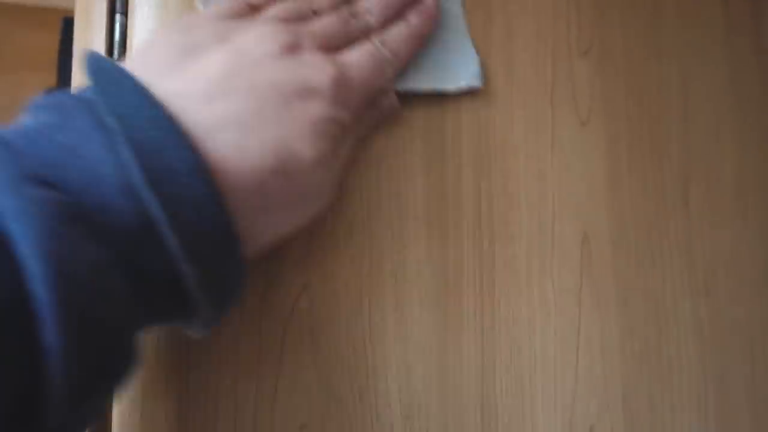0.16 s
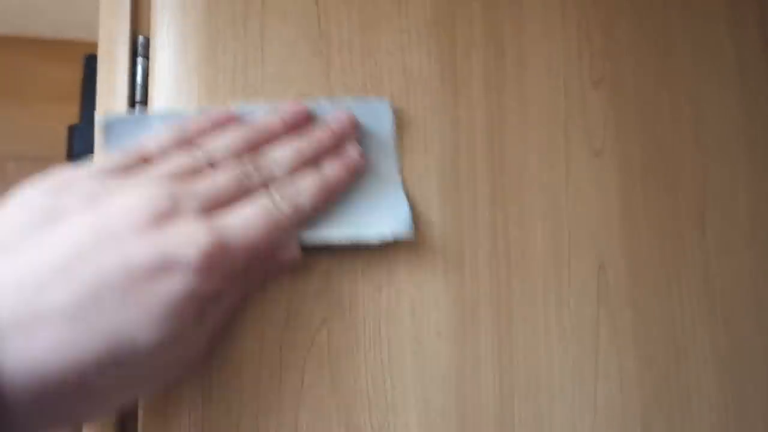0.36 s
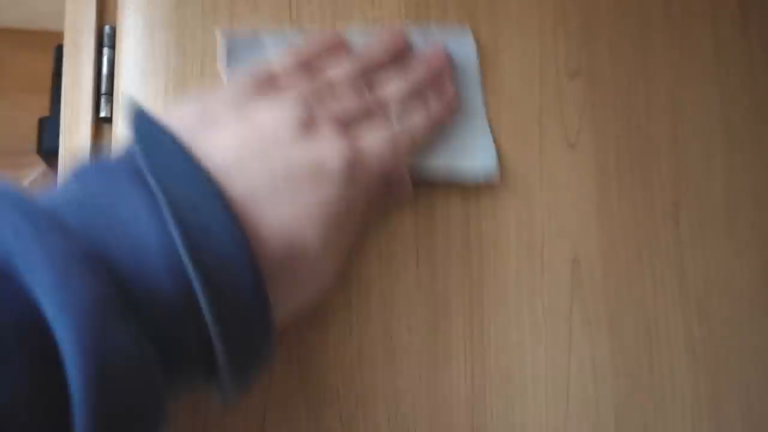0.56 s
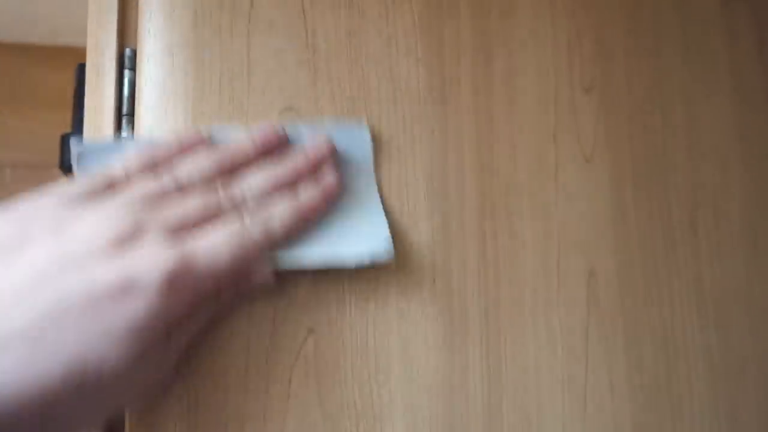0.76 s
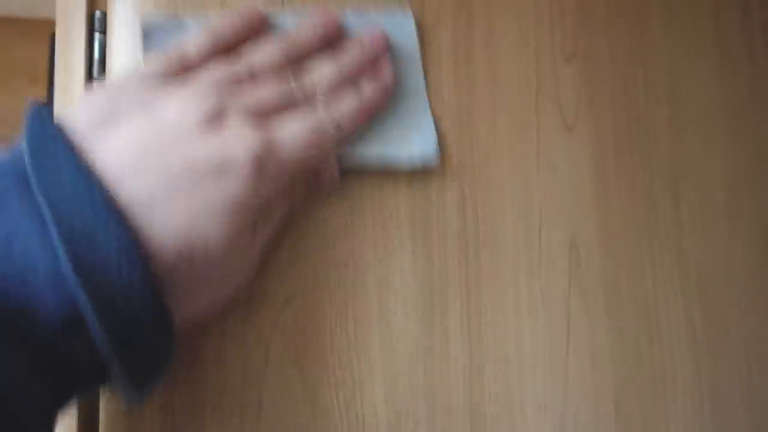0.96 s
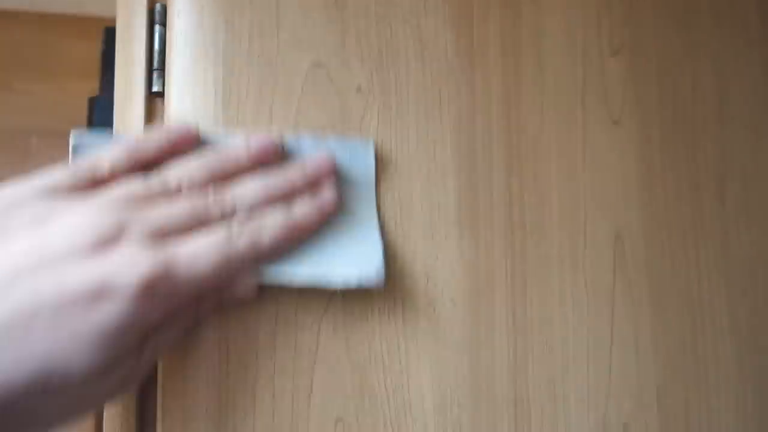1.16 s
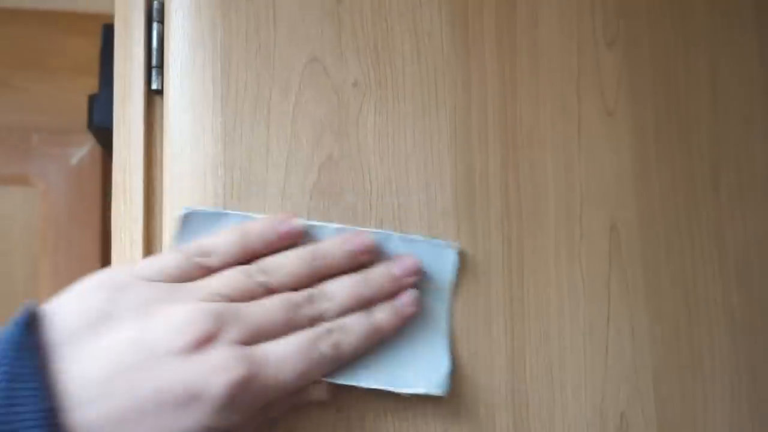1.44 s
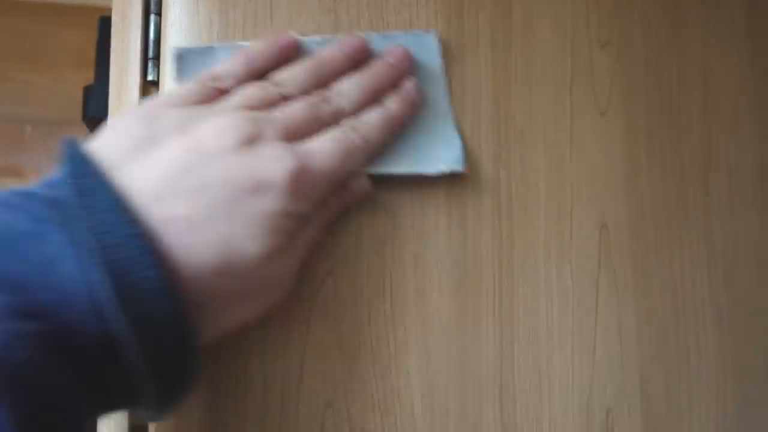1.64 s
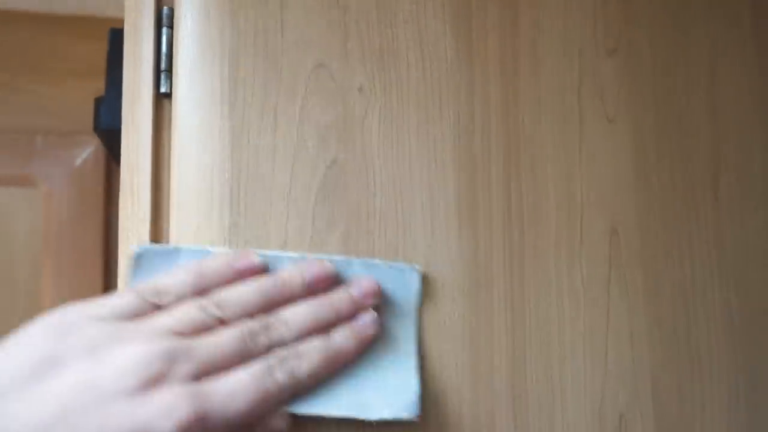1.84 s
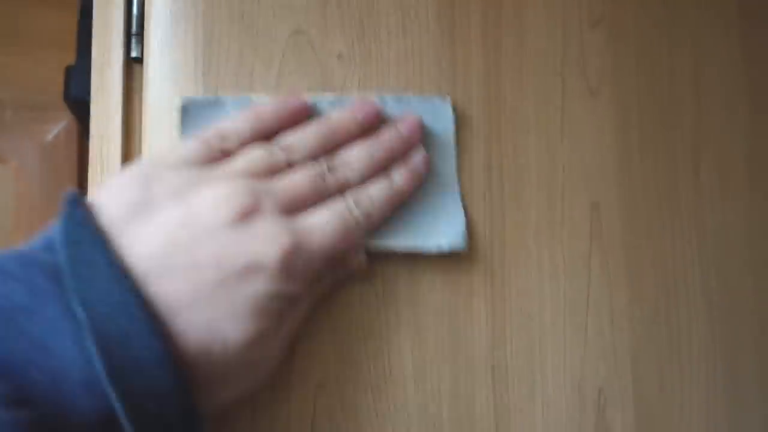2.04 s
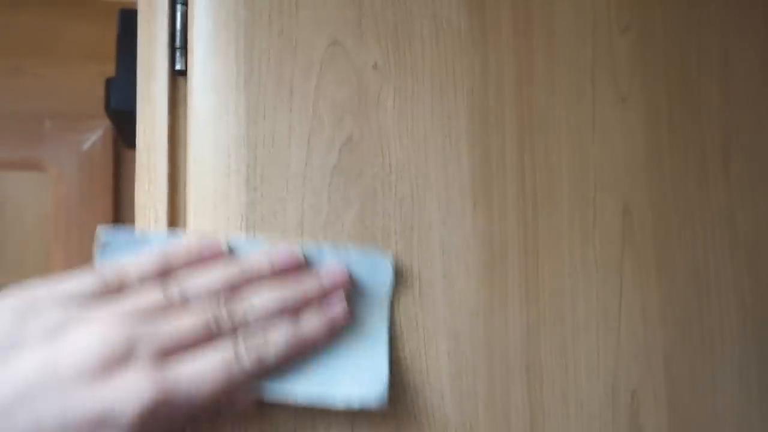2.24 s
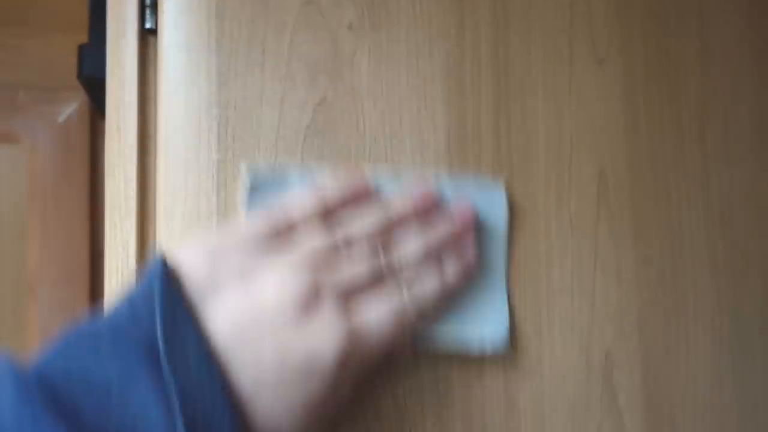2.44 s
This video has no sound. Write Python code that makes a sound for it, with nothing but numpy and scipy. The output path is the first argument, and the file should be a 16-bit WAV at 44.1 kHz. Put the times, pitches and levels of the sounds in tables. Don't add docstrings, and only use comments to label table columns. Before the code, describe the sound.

Sandpaper rubbed by hand over a wooden cabinet panel gives a bright, dense, scratchy rasp for about 2.6 seconds. It dulls briefly near 1.2 and 1.95 seconds as the hand slows. A faint hollow tone shifts beneath it, the board shudders around 0.35, and soft thumps come near 0.45, 0.8 and 1.0. A small rising squeak sounds at 2.3. Close stereo, quiet room with faint rumble.

```python
import sys
import numpy as np
from scipy import signal
from scipy.fft import rfft, irfft
from scipy.io import wavfile
from scipy.ndimage import uniform_filter1d

SR = 44100
rng = np.random.default_rng(int(sys.argv[2]) if len(sys.argv) > 2 else 0)


def to_wav(s):
    ch = np.atleast_2d(s).T
    pcm = np.round(np.clip(ch, -1, 1) * 32767)
    wavfile.write(sys.argv[1], SR, pcm.astype(np.int16))


def makeup_ratio(level_db):
    decades = np.asarray(level_db, float) / 20
    return 10 ** decades


N = 114660


def rms_one(x):
    return x / np.sqrt(np.mean(x ** 2) + 1e-20)


def in_time(rows):
    s, *columns = np.transpose(rows)
    return [np.interp(np.arange(N) / SR, s, column) for column in columns]


def at_hz(points, hz, axis=1):
    points = np.array(points)
    return np.interp(np.log(hz), np.log(points[:, 0]), points[:, axis])


def swing(x):
    return x - x.mean()


def high_pass(x, order, hz):
    return signal.sosfilt(signal.butter(order, hz, "high", fs=SR, output="sos"), x)


def drift(rate):
    r = np.exp(-40 * np.pi * rate / SR)
    noise = rng.standard_normal(N // 20 + 2002)
    slow = signal.lfilter([1], [1, -2 * r, r * r], noise)[2000:]
    return np.interp(np.arange(N) / 20, np.arange(len(slow)), rms_one(slow))


def grit():
    per_s, spread_db = 16000, 1.2
    sizes = makeup_ratio(spread_db * np.minimum(rng.exponential(1, N), 5))
    signs = rng.choice([-1, 1], N)
    return rms_one(sizes * signs * (rng.random(N) < per_s / SR))


def resonance(x, hz, width_hz):
    r = np.exp(-np.pi * width_hz / SR)
    poles = [1, -2 * r * np.cos(2 * np.pi * hz / SR), r * r]
    return signal.lfilter([(1 - r * r) / 2, 0, (r * r - 1) / 2], poles, x)


# f/Hz, likeness/0-1
LIKENESS = [(150, .999), (300, .995), (640, 0.89), (1400, 0.67), (3100, 0.77), (6800, 0.74), (10000, 0.65),
            (15000, 0.3)]
# f/Hz, level/dB
TILT = [(700, -0.5), (2000, -0.8), (5000, 0.5), (9000, 0.3), (13000, -4)]


def bands(low_hz, count, gain_db):
    edges = low_hz * 2 ** (np.arange(count + 1) / 3)
    grains = np.array([[grit(), grit()], [grit(), grit()]])
    out = 0
    for k, (low, high) in enumerate(zip(edges, edges[1:])):
        band = signal.butter(2, [low, high], "band", fs=SR, output="sos")
        mid, side = signal.sosfilt(band, grains[k % 2])
        hz = np.sqrt(low * high)
        alike = np.clip(at_hz(LIKENESS, hz), 0, 1)
        lean = makeup_ratio(at_hz(TILT, hz) * np.array([[.5], [-.5]]))
        stereo = np.sqrt(1 + alike) * mid + np.sqrt(1 - alike) * side * [[1], [-1]]
        out = out + makeup_ratio(gain_db(hz)) * lean * stereo
    return rms_one(out)


# t/s, level/dB, left-right/dB, deeper cut/dB rel. level
STROKE = [(0.0, -23.5, -2, -10.5), (0.03, -25, 1.5, -11.5), (0.76, -23.5, 1.0, -15), (1.0, -24, 2, -11),
          (1.1, -25, 2.0, -16), (1.12, -22.5, 1.5, -13.5), (1.22, -28.5, 1.0, -8.5),
          (1.24, -23.5, 1.5, -14.5), (1.56, -24.5, 1, -13), (1.76, -23.5, 1.5, -14.5),
          (1.92, -27, 0.0, -10), (1.95, -32, 1.0, -6.5), (2.03, -24, 1.0, -11), (2.17, -24, 1.0, -13),
          (2.28, -26.5, 0, -11), (2.33, -26, 2.5, -13.5), (2.51, -25, 0.5, -15.5), (2.6, -25, -0.5, -12)]
# t/s, level/dB
FINE_GRIT = [(0.0, -30.5), (0.06, -29), (0.93, -29.5), (0.96, -32.5), (1.13, -28.5), (1.22, -36.5),
             (1.25, -30), (1.38, -31), (1.44, -28), (1.54, -33), (1.85, -28), (1.98, -36.5), (2.01, -28.5),
             (2.11, -32.5), (2.17, -27.5), (2.27, -31.5), (2.36, -29.5), (2.6, -28.5)]
# f/Hz, level/dB per Hz
RASP_COLOUR = [(1180, -63), (2000, -10.5), (2720, -6), (3880, -1), (7720, -5.5), (10600, -3.5),
               (15600, -10.5), (16100, -5.5), (16500, -41)]
# f/Hz, speed share/1, fine-grit share/1, deeper-cut share/1
FOLLOWS = [(2000, 0.45, 0.06, 1.3), (2950, 1.36, 0.061, 0.82), (4160, 1.1, 0.25, 0.083),
           (6400, 0.99, 0.014, 0.0), (8500, 0.85, 0.96, 0.0), (12500, 1.37, 0.96, 0.0)]
# f/Hz, width/Hz, gain/dB
SHEET = [(3870, 250, 2), (4470, 220, 2), (5960, 3200, 3), (10800, 2300, 1.5), (15000, 1300, 3)]
# t/s, length/s, f/Hz, gain/dB
SPOTS = [(.28, 0.042, 7200, 2.5), (0.271, 0.036, 5100, 2), (.3, 0.033, 13800, -1), (.42, .05, 11500, 3),
         (0.488, .02, 13000, -3), (.57, 0.03, 13000, -5), (.6, 0.1, 7410, 3.5), (.78, .07, 9000, -1.5),
         (0.858, 0.039, 12500, -2.5), (.93, 0.028, 6200, 3.5), (0.982, 0.028, 12800, -7),
         (1.022, 0.037, 6300, 4.5), (1.364, .03, 13200, -3), (1.45, .03, 14200, 0), (1.673, 0.047, 4260, 3),
         (1.747, 0.059, 6600, 3.5), (1.761, .04, 5200, -0.5), (1.78, .06, 13000, -1),
         (1.873, 0.033, 6560, 4.5), (1.969, .015, 11400, -7), (1.965, .015, 6200, -4),
         (2.0, 0.017, 9500, 2), (2.16, 0.06, 4700, 0.5), (1.19, .025, 7500, -2.5), (0.573, 0.023, 3950, 2),
         (2.22, 0.07, 10540, -2), (2.3, 0.062, 5940, -3), (2.422, 0.057, 4400, 3), (2.469, 0.064, 13600, 2),
         (2.572, 0.025, 3890, 4)]


def rasp():
    level_db, pan_db, deep_db = in_time(STROKE)
    top_db = in_time(FINE_GRIT)[0] - level_db
    clumps_db = 0.55 * (0.5 * drift(32) + drift(310))

    def gain_db(hz):
        follow_db = at_hz(FOLLOWS, hz) * swing(level_db)
        follow_db = follow_db + at_hz(FOLLOWS, hz, axis=2) * swing(top_db)
        follow_db = follow_db + at_hz(FOLLOWS, hz, axis=3) * swing(deep_db)
        patchy_db = 0.6 * drift(17.0)
        return at_hz(RASP_COLOUR, hz) + clumps_db + patchy_db + follow_db

    out = high_pass(bands(1378, 11, gain_db), 4, 1650)
    for hz, width_hz, db in SHEET:
        out = out + (makeup_ratio(db) - 1) * resonance(out, hz, width_hz)
    spot_q = 7.4
    for s, length_s, hz, db in SPOTS:
        passing = np.exp(-((np.arange(N) / SR - s) / length_s) ** 2)
        out = out + (makeup_ratio(db) - 1) * passing * resonance(out, hz, hz / spot_q)

    speckle_q, speckle_db, speckle_per_s = 60, -10, 8
    speckle = 0
    for hz in np.geomspace(1700, 9500, 50) * rng.uniform(.985, 1.015, 50):
        speckle = speckle + makeup_ratio(speckle_db) * drift(speckle_per_s) * resonance(out, hz, hz / speckle_q)
    return makeup_ratio(level_db.mean() + 4.0 + pan_db * [[.5], [-.5]]) * rms_one(out + speckle)


# t/s, level/dB, centre f/Hz, overtone/dB rel. level
HOLLOW = [(0.01, -41, 1312, -5), (0.05, -40, 1490, -8), (0.17, -48.5, 1450, 10.5), (0.3, -36, 1467, -3),
          (0.37, -39, 1480, -5), (0.43, -45.5, 1394, 7.5), (0.53, -53, 1320, 11), (0.63, -45, 1400, 7.5),
          (0.74, -40, 1510, -9), (0.8, -42, 1443, 1.5), (0.89, -51.5, 1303, 8), (1.02, -50, 1326, 10.5),
          (1.14, -44.5, 1450, -2.5), (1.34, -49.5, 1398, 6.5), (1.6, -44.5, 1324, -2.5),
          (1.72, -49.5, 1356, 11), (1.83, -44.5, 1430, -7), (1.98, -43.5, 1264, -0.5),
          (2.14, -46, 1506, 0.5), (2.29, -44.5, 1332, 1.5), (2.5, -49.5, 1390, 2.5), (2.55, -43, 1318, -4),
          (2.59, -45.5, 1400, 2)]


def hollow():
    level_db, centre_hz, over_db = in_time(HOLLOW)
    tones = [(centre_hz, 565, level_db), (np.full(N, 1837), 420, level_db + over_db)]
    out = 0
    for hz, width_hz, db in tones:
        noise = [grit() + 1j * grit() for _ in range(2)]
        sway = signal.sosfilt(signal.butter(3, width_hz / 2, fs=SR, output="sos"), noise)
        mid, side = (sway * np.exp(2j * np.pi * np.cumsum(hz) / SR)).real
        stereo = rms_one(mid + 0.32 * side * [[1], [-1]])
        out = out + makeup_ratio(db + 0.5) * stereo * makeup_ratio([[.4], [-.4]])
    return out


# t/s, level/dB, then upper, main and lowest modes/dB rel. level
PRESS = [(0.01, -50, 1.5, -3, -6.5), (0.2, -53.5, 4.5, 5.5, -6), (0.3, -49, 2.5, -8, 0),
         (0.34, -42, -9, -10, -23), (0.42, -53, 6.5, -3, -4), (0.71, -48.5, -4.5, 4, -9),
         (0.85, -54.5, 5, -20, 0), (0.91, -55, 8, 8, -4), (1.05, -55.5, 0.5, 9, -2),
         (1.17, -47, -0.5, -4, -14), (1.22, -53.5, -3, 0, -8), (1.3, -61, 10, 2.5, -5),
         (1.49, -62, 1, 2, -7), (1.54, -52, 7, -9, 1), (1.63, -60, -1, 5, 7), (1.69, -51.5, -2, -2, -2),
         (1.79, -43, -3, -7, -16), (1.82, -61.5, 5, 5, 4), (1.9, -48.5, -2, -11, -5),
         (1.97, -53, -5, 2, -2), (2.05, -52.5, -3, 2, -5), (2.2, -55.5, 3, -2, -7),
         (2.31, -52.5, 5.5, -5, 1), (2.42, -53.5, -4, -8, -10), (2.59, -54, 9, -2, -4)]
# f/Hz, level/dB, t60/s
PANEL = [(110.3, -1, 0.065), (148, -4, 0.098), (210, -12, 0.069), (234.6, 4, 0.33), (323.4, -1, 0.098),
         (416, -8.5, 0.17), (529, -1, 0.13), (648.5, -8.5, 0.077), (774, -4, 0.09), (873, -11, 0.083),
         (1003, -12, 0.056), (1262, -7, 0.099)]
MODE_GROUPS_HZ = [180, 280, 600]


def panel():
    hand_smooth_s = 0.03
    level_db, upper_db, main_db, low_db = uniform_filter1d(in_time(PRESS), int(hand_smooth_s * SR))
    push = grit()
    groups = np.zeros((4, N))
    for k, (hz, db, t60) in enumerate(PANEL):
        width_hz = np.log(1000) / np.pi / t60
        drive = push * makeup_ratio(db + 2.0 * drift(7.5))
        ring = resonance(drive, hz, width_hz) / np.sqrt(width_hz)
        groups[np.searchsorted(MODE_GROUPS_HZ, hz)] += (-1) ** k * ring
    out = 0
    for group, db in zip(groups, [low_db, main_db, 0, upper_db]):
        out = out + makeup_ratio(level_db + db + 0.34) * rms_one(group)
    return out


# f/Hz, level/dB per Hz
ROOM = [(15, -50), (25, -20.5), (230, -3.5), (461, -6.5), (525, -8.5), (926, -7.5), (1200, -22),
        (1560, -36), (2640, -120)]


def room():
    press_db = in_time(PRESS)[0]

    def gain_db(hz):
        board_share = 0.35 * (MODE_GROUPS_HZ[1] < hz < MODE_GROUPS_HZ[2])
        return at_hz(ROOM, hz) + 1.5 * drift(3) + board_share * swing(press_db)

    return makeup_ratio(-49.0) * bands(21.44, 17, gain_db)


# t/s, f/Hz, level/dB, length/s
SHUDDERS = [(0.325, 413, -35, .02), (.343, 415, -34, 0.012), (.342, 287, -41, .012), (0.357, 244, -38, .02),
            (.395, 239, -41, 0.032), (.38, 486, -39, 0.0078), (1.153, 225, -41, 0.024),
            (1.178, 430, -39, .015), (1.18, 524, -43, .02), (1.328, 229, -44, 0.046),
            (1.711, 237, -40.5, .025), (1.42, 234.6, -49, 0.073), (1.784, 407, -42, .02),
            (1.791, 531, -45, 0.023), (1.828, 238, -43, .02), (1.895, 768, -41, .02),
            (1.95, 775, -41.5, .035), (1.953, 212, -39.5, .025), (1.945, 320, -41.5, 0.022),
            (2.058, 240, -42, 0.033), (2.125, 254, -42, 0.031), (2.52, 231.1, -44, 0.018),
            (2.55, 200, -43, 0.018)]


def shudders():
    t = np.arange(N) / SR
    waver = 0.52 * drift(70)
    out = 0
    for s, hz, db, length_s in SHUDDERS:
        swell = np.exp(-2 * ((t - s) / length_s) ** 2)
        out = out + makeup_ratio(db) * swell * np.sin(2 * np.pi * hz * (t - s) + waver)
    return out


# t/s, level/dB
THUMPS = [
    (.452, -37),
    (.525, -44),
    (.78, -37),
    (0.999, -42),
    (1.55, -57),
    (2.03, -46),
    (2.29, -44),
]


def thumps():
    t = np.arange(N) / SR
    length_s = 0.0032
    out = 0
    for s, db in THUMPS:
        u = (t - s) / length_s
        out = out + makeup_ratio(db) * u * np.exp(-u * u / 2)
    return high_pass(out, 2, 45)


# start t/s, end t/s, from f/Hz, to f/Hz, level/dB
SQUEAK = (2.29, 2.375, 4350, 5200, -31)


def squeak():
    start, end, from_hz, to_hz, db = SQUEAK
    u = np.clip((np.arange(N) / SR - start) / (end - start), 0, 1)
    sway = drift(58.5) + 1j * drift(60)
    hz = from_hz + (to_hz - from_hz) * u
    whistle = (sway * np.exp(2j * np.pi * np.cumsum(hz) / SR)).real
    return makeup_ratio(db) * np.sin(np.pi * u) * whistle


# f/Hz, phase/rad
LEAD = [(1000, 0.0), (2900, .1), (3600, .5), (5500, .65), (7500, .9), (11200, .85), (14100, 1.8),
        (15800, 2.3)]


def delay_right(stereo):
    hz = np.fft.rfftfreq(N, 1 / SR) + 1
    stereo[1] = irfft(rfft(stereo[1]) * np.exp(-1j * at_hz(LEAD, hz)), N)
    return stereo


def scene():
    bright = delay_right(rasp() + hollow() + squeak())
    board = panel() * makeup_ratio([[.15], [-.15]])
    return bright + board + room() + shudders() + thumps()


def top_cut(x):
    return signal.sosfilt(signal.butter(12, 15745, fs=SR, output="sos"), x)


def record(dry):
    return top_cut(dry)


dry = scene()
out = record(dry)
to_wav(out)
```